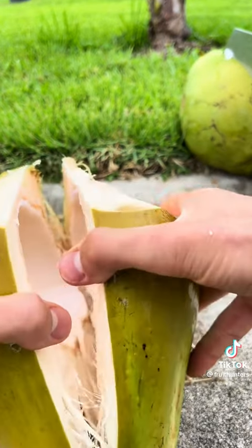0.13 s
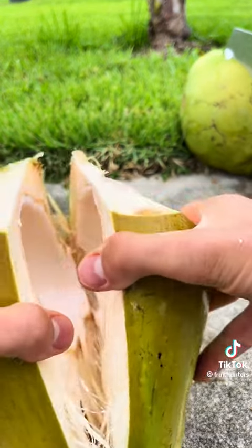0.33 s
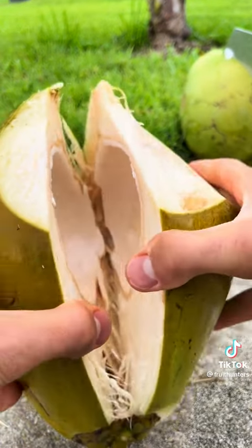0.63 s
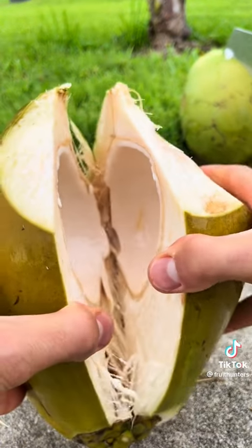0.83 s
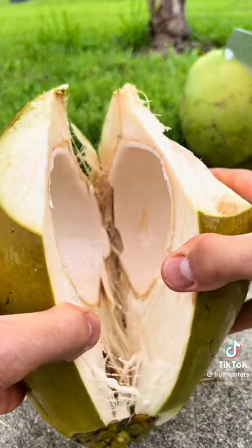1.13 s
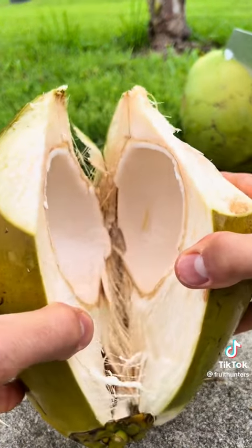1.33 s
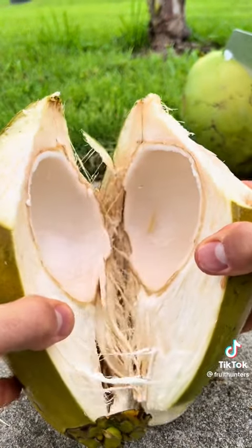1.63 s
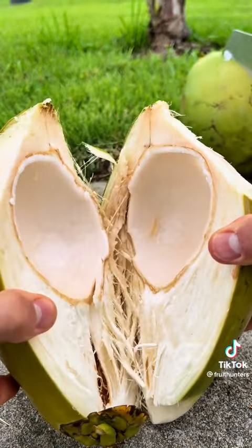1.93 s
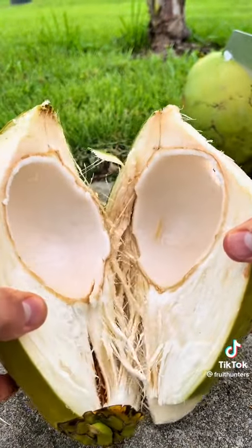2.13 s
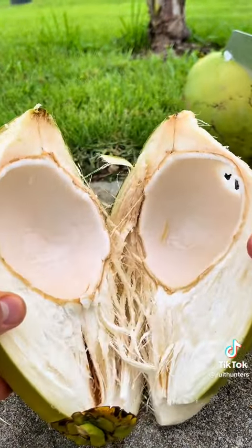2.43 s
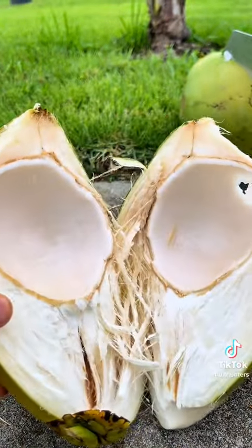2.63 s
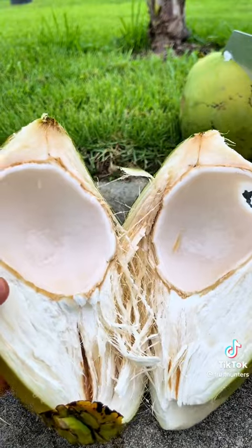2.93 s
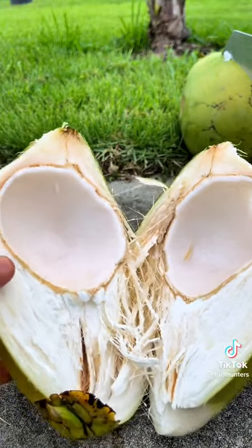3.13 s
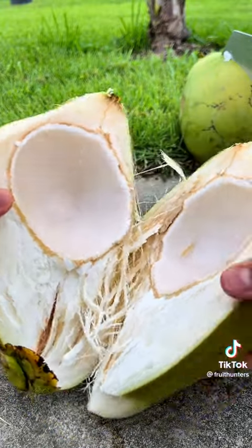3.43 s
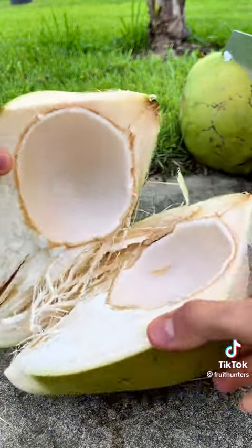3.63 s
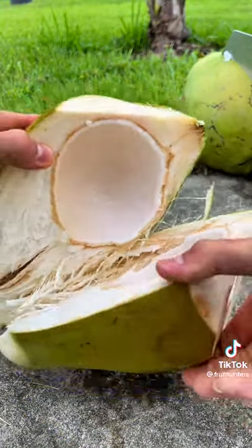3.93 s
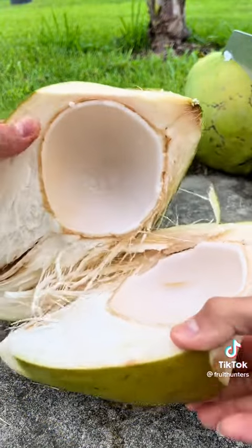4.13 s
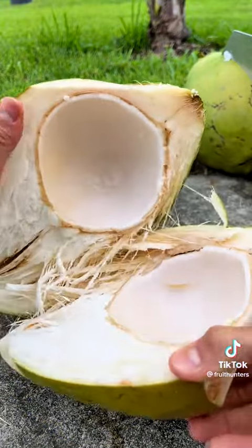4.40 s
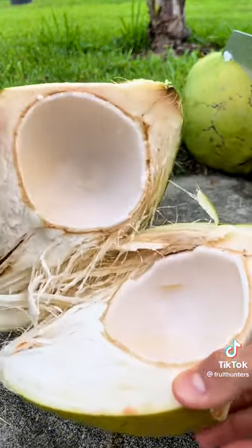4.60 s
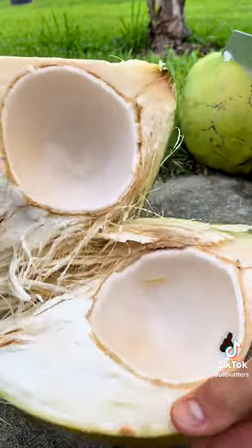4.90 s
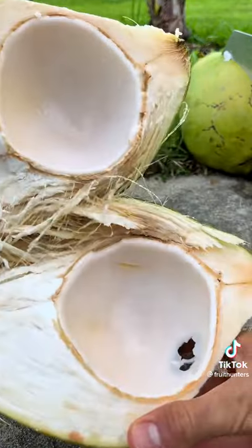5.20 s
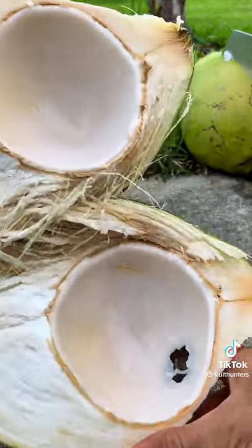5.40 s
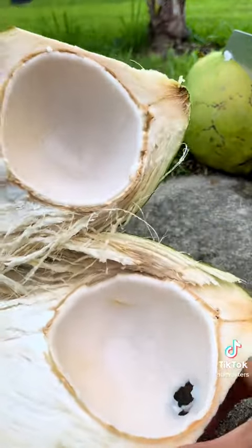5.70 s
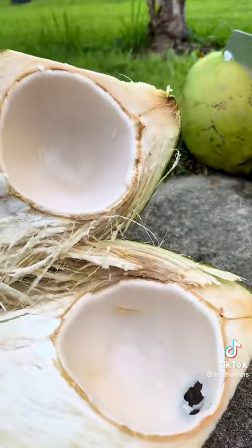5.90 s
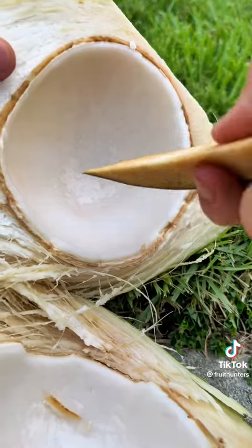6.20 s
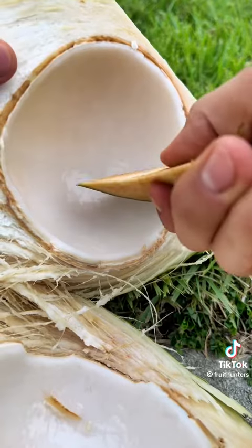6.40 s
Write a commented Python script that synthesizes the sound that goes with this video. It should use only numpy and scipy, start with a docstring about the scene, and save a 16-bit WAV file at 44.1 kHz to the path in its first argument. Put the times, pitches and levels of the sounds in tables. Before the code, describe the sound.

A green coconut is pulled apart by hand, its husk fibres snapping, crackling and tearing over a distant engine hum.

```python
"""A split green coconut is pulled apart by hand, outdoors and close to a phone. Its husk fibres fail in
brittle snaps and crackling spurts; each snap is an impulse that excites damped modes of the husk and a
dull ring of the hollow shell. Hands brush the husk with soft friction noise. Far off, a vehicle's engine
tones rise through a gear and drop, over traffic rumble, a low hum, insects and a few bird chirps."""
import sys
import numpy as np
from scipy import signal
from scipy.fft import rfft, irfft, next_fast_len
from scipy.io import wavfile
from scipy.ndimage import uniform_filter1d

SR = 44100
rng = np.random.default_rng(int(sys.argv[2]) if len(sys.argv) > 2 else 0)


def file_out(sig):
    """Save sig as 16-bit WAV at sys.argv[1]."""
    # one column per channel
    cols = np.atleast_2d(sig).T
    # limit, then scale
    lim = np.clip(cols, -1, 1)
    pcm = np.round(lim * 32767).astype(np.int16)
    wavfile.write(sys.argv[1], SR, pcm)


N = 288855


def amp(db):
    return 10 ** (np.asarray(db) / 20)


def unit_rms(x):
    return x / np.sqrt(np.mean(x ** 2) + 1e-20)


def at_frequency(points, hz):
    """Interpolation of (f/Hz, value) points on a logarithmic frequency axis."""
    f, value = np.transpose(points)
    return np.interp(np.log(hz + 1), np.log(f + 1), value)


def level_curve(times, db):
    """Level in dB at every sample, silent outside the given times."""
    return np.interp(np.arange(N) / SR, times, db, -120, -120)


def add(mix, start, sound):
    """Superposition of a sound on the mix from a start time in seconds."""
    part = mix[:, round(start * SR):][:, :sound.shape[-1]]
    part += sound[..., :part.shape[1]]


def drift(rate_hz):
    """Random fluctuation of rms 1: white noise through two first-order low-passes."""
    lowpass = [1], [1, -np.exp(-2 * np.pi * rate_hz / SR)]
    return unit_rms(signal.lfilter(*lowpass, signal.lfilter(*lowpass, rng.standard_normal(N))))


def resonate(x, hz, width_hz):
    """Resonance of unit gain by heterodyning: shift down to zero, smooth, shift back."""
    carrier = np.exp(2j * np.pi * hz * np.arange(x.shape[-1]) / SR)
    pole = np.exp(-np.pi * width_hz / SR)
    return 2 * (carrier * signal.lfilter([1 - pole], [1, -pole], x / carrier)).real


def traffic():
    """Traffic and air as random-phase noise, less coherent between the channels as frequency rises."""
    # noise spectrum: f/Hz, relative density/dB
    spectrum = [(35, -41), (60, 2.5), (135, -5), (400, -22.5), (700, -29.5), (1300, -37), (4300, -47),
                (5500, -53), (6600, -45), (8300, -58), (9200, -63), (16000, -55.5)]
    # left-right likeness: f/Hz, coherence
    coherence = [(180, 1), (550, 0.7), (1650, 0.64), (4970, 0.33), (15000, 0.25)]
    frames, hz = N // 512 + 5, np.fft.rfftfreq(2048, 1 / SR)[:, None]
    a, b, c, d, patches = rng.standard_normal((frames, 1025, 5)).T
    patches = unit_rms(uniform_filter1d(uniform_filter1d(patches, 20, 0), 8, 1))
    flicker_db = 2.5 * patches * np.clip(hz / 800, 0, 1)
    shared = at_frequency(coherence, hz)
    left = a + 1j * b
    right = shared * left + np.sqrt(1 - shared ** 2) * (c + 1j * d)
    spectra = np.array([left, right]) * amp(at_frequency(spectrum, hz) + flicker_db)
    _, noise = signal.istft(spectra, nperseg=2048, noverlap=1536)
    return amp(-42) * unit_rms(noise[:, 1024:N + 1024])


def hum():
    """A low tone wavers under random amplitude and phase modulation."""
    hz = 43.5
    envelope = np.sqrt(2) * amp(-44 + 3.7 * drift(13))
    return envelope * np.sin(2 * np.pi * hz * np.arange(N) / SR + 1.8 * drift(12))


def insects():
    """A far chorus sums to band noise: a throbbing narrow band over a wider one."""
    # chorus loudness: t/s, level/dB
    chorus = [(0, -71), (2.9, -67), (3.151, -66), (3.599, -69), (6.12, -69), (6.2, -65), (6.55, -74.5)]
    noise = rng.standard_normal((2, 2, N))
    narrow = unit_rms(resonate(resonate(noise[0], 7450, 200), 7450, 200)) * amp(3 * drift(30))
    wide = unit_rms(resonate(resonate(noise[1], 7480, 800), 7480, 800))
    return amp(level_curve(*np.transpose(chorus))) * (narrow + 1.1 * wide)


def ring(modes, scale, force, weight_db=0):
    """Damped modal response of peak 1; bending waves disperse, so high modes sound first."""
    lag_cycles = 1.295
    pitch, db, t60 = np.transpose(modes)[:, :, None]
    hz = pitch * scale
    t = np.maximum(np.arange(len(force)) / SR - lag_cycles / hz, 0)
    response = (amp(db + weight_db - 60 * t / t60) * np.sin(2 * np.pi * hz * t)).sum(0)
    motion = signal.fftconvolve(force, response)[:len(force)]
    return motion / abs(motion).max()


def husk_crack(force, crack_hz):
    """Selective excitation: the place of a break favours husk modes near its crack pitch."""
    # husk modes before tuning: f/Hz, relative level/dB, T60/s
    husk_modes = [(529, -5.5, 0.018), (1474, -5, 0.01), (1985, -6, 0.019), (2706, 2, 0.0077),
                  (3293, -3.5, 0.007)]
    octaves = np.log2(np.array(husk_modes)[:, :1] / crack_hz)
    tuning = 2. ** -octaves[abs(octaves).argmin(), 0]  # moves the nearest mode to the crack pitch
    return ring(husk_modes, tuning, force, weight_db=-36.5 * octaves ** 2)


def shell_knock(force, place):
    """Heavily damped modes of the hollow shell; the pitch strays with the place of the break."""
    # shell modes: f/knock pitch, relative level/dB, T60/s
    shell_modes = [(.55, -6.5, 0.016), (.84, -1.5, 0.016), (1.05, 9.5, 0.014), (1.5, -8.5, 0.012)]
    knock_hz = 868 * np.exp(0.013 * place)
    return ring(shell_modes, knock_hz, force)


def snap(tick_db, knock_db, crack_db, tick_hz, crack_hz, place, noise):
    """Brittle fracture: a ragged burst of a few milliseconds ticks and drives husk and shell."""
    core_db, core_sample = 18, 60  # the bundle's core parts in one click above the fraying
    t = np.arange(noise.shape[1]) / SR
    ragged = amp(1.28 * unit_rms(uniform_filter1d(noise[0], 30)))  # strands part one after another
    envelope = (1 - np.exp(-t / 0.0034)) ** 2 * amp(-60 * t / 0.0093) * ragged
    burst, side = noise * envelope / envelope.max()
    burst[core_sample] += amp(core_db)
    ports = np.array([burst + 0.22 * side, burst - 0.79 * side])  # treble differs at the two ports
    bright = signal.lfilter(*signal.butter(1, [3800, 13000], "band", fs=SR), ports)
    tick = resonate(ports, tick_hz, 1100) + 0.31 * bright
    force = burst.copy()
    force[core_sample] += amp(core_db + 8)  # the nut feels mostly the parting core
    crack = amp(crack_db) * husk_crack(force, crack_hz)
    knock = amp(knock_db) * shell_knock(force, place)
    return amp(tick_db) * (tick / abs(tick).max() + crack + knock)


def snaps():
    """Bundles and single strands fracture; a level difference sets each a little left or right."""
    # fibre bundles: t/s, tick level/dB, knock/dB re tick, crack/dB re tick, tick f/Hz, crack f/Hz
    bundles = [(0.383, -40, -15, -3, 6300, 3230), (0.6256, -38, 1.5, 0.5, 6700, 2120),
               (1.108, -34, -18, -8, 6400, 2670), (1.129, -11, -5.5, 2, 5700, 2610),
               (1.1658, -37, -2, 5.5, 7500, 1570), (1.209, -34.5, -8, -0.5, 4270, 2700),
               (1.287, -30.5, -16, 5.5, 6870, 2300), (1.332, -24.5, -17, -5, 6400, 2800),
               (1.4606, -22.5, -2, -8, 7800, 2100), (1.5018, -27.5, -13, -0.5, 4170, 2650),
               (1.5211, -19, -9, -19, 6340, 2140), (1.5587, -25, -7, -2, 3830, 2700),
               (1.566, -31, -10, 3, 6600, 1900), (1.694, -25.5, -4, 0.5, 6640, 510),
               (1.943, -24.5, -10, 2, 4740, 2660), (2.082, -25, -6.5, -8, 7260, 1710),
               (2.3781, -11.5, -7.5, -9.5, 8300, 545), (2.393, -17.5, -15, -7.5, 4540, 2700),
               (2.4675, -25, -24, -7.5, 6310, 2630), (2.5103, -11.5, -9, -12.5, 8000, 2980),
               (2.5597, -18.5, -16, -14, 6376, 530), (2.6152, -20.5, -21, -8, 5760, 2550),
               (2.636, -17.5, -23, -8, 8400, 2960), (2.6724, -22.5, -2.5, -7, 5660, 2986),
               (2.8815, -18, -35, -12, 4830, 3220), (3.2863, -30, -15, -17, 8550, 3020),
               (3.39, -60.5, 20.5, 10, 7430, 1510), (3.41, -61.5, 21, -5, 6650, 1500),
               (3.529, -27.5, -5.5, -13, 8300, 2100), (3.589, -51, 12, 4, 4000, 2370),
               (3.613, -52, 7, 8, 6000, 1270), (4.4068, -47.5, 19.5, 4, 7500, 1520),
               (4.4362, -25, -11, -12, 5340, 2120), (4.449, -24, -22, -4.5, 7100, 2322),
               (4.507, -6.5, -7.5, -10, 4430, 1910), (4.5412, -25, 2, -9, 7400, 2230),
               (4.569, -7, -7, -14.5, 7800, 1660), (4.655, -14, -8, -12, 6400, 1840),
               (4.6678, -13, -4.5, -3, 6700, 1790), (4.9146, -29, -21, -9, 5600, 2300),
               (4.956, -18.5, -42, -8, 7400, 3040), (5.0816, -17, -17.5, -10.5, 6670, 2420),
               (5.245, -27, 0.5, -2, 7010, 1510), (5.319, -18.5, -11, -12, 6750, 1390),
               (5.3869, -37, -3, -1, 6020, 2110), (5.445, -28, -14, -8.5, 5580, 3330)]
    # single strands: t/s, tick level/dB, tick f/Hz
    strands = [(0.4863, -47, 7040), (0.6, -44, 7400), (1.0876, -38.5, 7620), (1.3823, -20, 3900),
               (1.3895, -18.5, 6300), (1.4506, -16.5, 4910), (1.541, -20, 8050), (1.712, -19.5, 6820),
               (1.7896, -23.5, 6530), (2.0953, -20.5, 6650), (2.101, -22, 8250), (2.1713, -17, 6260),
               (2.2073, -22, 6890), (2.233, -23.5, 6320), (2.3298, -21.5, 6600), (2.4585, -24, 4320),
               (2.7455, -21.5, 6130), (2.815, -23.5, 8160), (4.1954, -23.5, 4440), (4.2223, -26.5, 7300),
               (4.3135, -21, 7500), (4.335, -20, 7600), (4.5028, -16.5, 4380), (4.5456, -16.5, 8400),
               (4.5815, -17, 7380), (4.6402, -20, 7230), (4.6425, -18, 7650), (4.7028, -26, 7230),
               (4.9013, -24, 6900), (4.979, -18.5, 6270), (5.0225, -24, 6840), (5.0597, -16.5, 5950),
               (5.0942, -19.5, 6740), (5.1106, -21, 6850), (5.149, -22, 6470), (5.155, -24, 6540),
               (5.1633, -11.5, 6620), (5.1685, -13, 6300), (5.2047, -22, 6600), (5.2192, -16, 6000),
               (5.2308, -15, 7130), (5.2667, -25.5, 7540), (6.1005, -41.5, 3640)]
    knock_db, crack_db, crack_hz = -21.5, -18.5, 1500  # the nut's response to a single strand
    draws = rng.standard_normal((len(bundles) + len(strands), 2616))
    breaks = list(bundles)
    for (start, db, tick_hz), detune in zip(strands, draws[len(bundles):, 2]):
        breaks.append((start, db, knock_db, crack_db, tick_hz, crack_hz * np.exp(0.33 * detune)))
    out = np.zeros((2, N))
    for (start, *settings), draw in zip(breaks, draws):
        balance = amp(0.8 * draw[3] * np.array([[1], [-1]]))
        sound = snap(*settings, place=draw[1], noise=draw[16:].reshape(2, -1))
        add(out, start - .0007, balance * sound)
    return out


def scatter(direct):
    """Diffuse early reflections from stone and the cupped halves, wider in the treble."""
    t, t60 = np.arange(2200) / SR, 0.086
    mid, side = rng.standard_normal((2, len(t))) * amp(-60 * t / t60) * (t > .001)
    side = signal.lfilter(*signal.butter(2, 3500, "high", fs=SR), side)
    response = np.array([mid + side, mid - side]) / np.linalg.norm(mid)
    return signal.oaconvolve(direct, response, axes=1)[:, :N]


def vehicle():
    """Periodic firing: engine tones rise with the speed and drop, sputtering, as it slows."""
    # distant engine: t/s, firing f/Hz, firing level/dB, undertone level/dB
    engine = [(0.403, 130, -49, -50.5), (0.551, 127.5, -41, -48), (0.802, 113.2, -41, -43),
              (1.028, 112.2, -42.5, -44.5), (1.5, 112.1, -39, -42), (2.598, 117.9, -37, -42.5),
              (3.196, 120.2, -31.5, -42), (3.499, 122.6, -26.5, -47), (3.8, 124.5, -31.5, -51),
              (4.002, 125.5, -31, -43), (5.001, 133.5, -32, -51), (5.184, 131.2, -34.5, -51),
              (5.54, 116.2, -33.5, -41), (5.583, 113.5, -57, -46), (5.62, 112, -36, -42),
              (5.7, 110.7, -39, -46.5), (5.79, 112.5, -55, -39.5), (5.86, 109.5, -40.5, -44),
              (5.93, 106.4, -32.5, -40.5), (5.96, 109.5, -64, -70)]
    times, hz, firing_db, under_db = np.transpose(engine)
    phase = 2 * np.pi * np.cumsum(np.interp(np.arange(N) / SR, times, hz)) / SR
    firing = np.sin(phase) + amp(-26.5) * np.sin(1.63 * phase)
    firing *= amp(level_curve(times, firing_db) + 0.96 * drift(7.2))
    undertone = amp(level_curve(times, under_db) + 1.4 * drift(3.1))
    undertone *= np.sin(.63 * phase + 1.42 * drift(8.3))
    return np.sqrt(2) * (firing + undertone)


def crackle():
    """Shot noise of parting fibres, each a damped ring; gives a low and a high band of even power."""
    # colour of the fibres: f/Hz, relative density/dB
    colour = [(480, -5.5), (900, -5.5), (1900, -10), (2800, -4.5), (3300, -11), (6700, -8.5), (8300, -10),
              (10000, -13.5), (15000, -6)]
    thin_per_s, thick_per_s, split_hz = 6000, 260, 3800
    clumps = amp(4.6 * drift(90))
    thin = rng.random(N) < thin_per_s * clumps / SR
    thick = amp(-1 + 9.9 * np.minimum(rng.exponential(1, N), 2))
    thick *= rng.random(N) < thick_per_s / SR
    fraying = np.exp(-np.arange(120) / 14) * rng.random(120)
    impulses = thin + np.convolve(thick, fraying)[:N]
    pitch_index = rng.integers(0, 32, N // 60 + 1).repeat(60)[:N]
    t, bands = np.arange(700) / SR, np.zeros((2, 2, N))
    for k, hz in enumerate(np.geomspace(350, 15000, num=32)):
        grain = amp(at_frequency(colour, hz)) * hz * np.sin(2 * np.pi * hz * t) * np.exp(-t * hz / 5.4)
        excited = abs(pitch_index - k) <= 6  # one break excites neighbouring pitches
        rings = signal.oaconvolve(excited * impulses * rng.choice([-1, 1], N), grain)[:N]
        pan = rng.uniform(-0.53, 0.62, N // 200 + 1).repeat(200)[:N]
        pan *= np.clip(hz / 7000, 0, 2)  # high pitches spread wider
        bands[int(hz > split_hz)] += rings * [1 + pan, 1 - pan]
    power = uniform_filter1d((bands ** 2).mean(1, keepdims=True), 2600)
    return bands / np.sqrt(power + 1e-12)


def tearing():
    """Spurts of pull modulate the crackle and the friction hiss of rubbing strands."""
    # spurts of fine tearing: t/s, duration/s, level/dB
    spurts = [(1.255, 0.11, -44), (1.376, 0.12, -43), (1.489, 0.086, -43.5), (1.598, 0.047, -41.5),
              (1.68, 0.015, -38), (1.729, 0.027, -39), (1.803, 0.041, -47), (1.867, 0.18, -45),
              (2.076, 0.032, -49.5), (2.128, 0.093, -48.5), (2.243, 0.12, -47), (2.431, 0.038, -48),
              (2.51, 0.033, -45.5), (2.573, 0.046, -47.5), (4.422, 0.038, -48.5), (4.537, 0.066, -43),
              (4.614, 0.075, -43), (4.832, 0.16, -63), (5.005, 0.061, -50), (5.071, 0.046, -55),
              (5.119, 0.017, -45), (5.198, 0.083, -51.5), (5.308, 0.032, -50)]
    # low crackle sounding through the husk: t/s, gain/dB
    husk_gain = [(1.202, -2), (2.7, -2), (5.1, -2), (5.3, -4.5)]
    stray_db, rasp_db = -4.5, -9.5  # fibres parting around each spurt; rubbing strands
    pull = np.zeros((1, N))
    for start, length, db in spurts:
        add(pull, start - .004, amp(db) * signal.windows.tukey(round((length + 0.016) * SR), .3))
    surround = uniform_filter1d(uniform_filter1d(pull, 3000), 3000)
    pull += amp(stray_db) * surround
    low, high = crackle()
    hiss = signal.lfilter(*signal.butter(2, 7500, "high", fs=SR), rng.standard_normal((2, N)))
    rasp = amp(rasp_db) * unit_rms(hiss)
    body = amp(np.interp(np.arange(N) / SR, *np.transpose(husk_gain)))
    return pull * (body * low + high + rasp) + surround * rasp


def birds():
    """Short frequency glides; random amplitude modulation gives the blur of distance."""
    # faint whistles: t/s, duration/s, start f/Hz, end f/Hz, level/dB
    chirps = [(2.981, 0.058, 2900, 3070, -67), (3.43, 0.054, 2880, 2920, -65),
              (3.918, 0.089, 2730, 2990, -74)]
    out, blur = np.zeros((2, N)), amp(5 * drift(200))
    for start, length, start_hz, end_hz, db in chirps:
        hz = np.linspace(start_hz, end_hz, round(length * SR))
        whistle = np.sin(2 * np.pi * np.cumsum(hz) / SR)
        add(out, start, amp(db) * whistle * signal.windows.tukey(len(hz), .5))
    return out * blur


def brushing():
    """Sliding friction of hands on husk gives soft swells of grainy band noise."""
    # hand strokes: t/s, duration/s, level/dB, lower band edge f/Hz
    strokes = [(3.241, 0.1, -60.5, 2980), (3.442, 0.25, -61.5, 566), (3.506, 0.12, -56.5, 2660),
               (3.638, 0.084, -56, 3980), (3.76, 0.14, -64, 4500), (5.76, 0.029, -69.5, 1980),
               (5.917, 0.2, -67.5, 4000)]
    out = np.zeros((2, N))
    for start, length, db, low_hz in strokes:
        mid, side, grain = rng.standard_normal((3, SR // 2))[:, :round(length * SR)]
        roughness = amp(3.3 * unit_rms(uniform_filter1d(grain, 200)))
        rub = np.array([mid + 0.59 * side, mid - 0.39 * side]) * roughness
        rub = signal.lfilter(*signal.butter(2, [low_hz, min(4.2 * low_hz, 15000)], "band", fs=SR), rub)
        add(out, start, amp(db) * unit_rms(rub) * signal.windows.tukey(len(mid), .7))
    return out


def scene():
    """Superposition of all sources; the nut is too small to radiate bass."""
    nut = signal.lfilter(*signal.butter(3, 310, "high", fs=SR), snaps() + tearing())
    near = nut + amp(-18.5) * scatter(nut) + brushing()
    return near + vehicle() + hum() + traffic() + insects() + birds()


def record(dry):
    """A two-port microphone as a linear filter: magnitude response, port phase, then a band limit."""
    # microphone colour: f/Hz, gain/dB
    response = [(30, -21), (38, 0.5), (8500, 2), (9800, -4), (15000, -5), (15900, -23)]
    # lead of the left port over the right: f/Hz, phase/rad
    port_lead = [(4700, 0.052), (6500, -0.68), (14500, -1.6)]
    size = next_fast_len(N + 8192)
    hz = np.fft.rfftfreq(size, 1 / SR)
    gain = amp(at_frequency(response, hz))
    phase_shift = np.exp(.5j * at_frequency(port_lead, hz) * np.array([[1], [-1]]))
    coloured = irfft(rfft(dry, size) * gain * phase_shift, size)[:, :N]
    lowpass = signal.firwin(511, cutoff=16400, window=("kaiser", 9), fs=SR)
    return signal.oaconvolve(coloured, lowpass[None], "same")


dry = scene()
out = record(dry)
file_out(out)
```